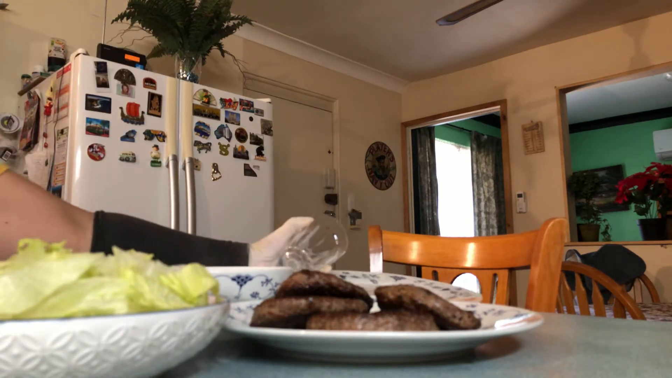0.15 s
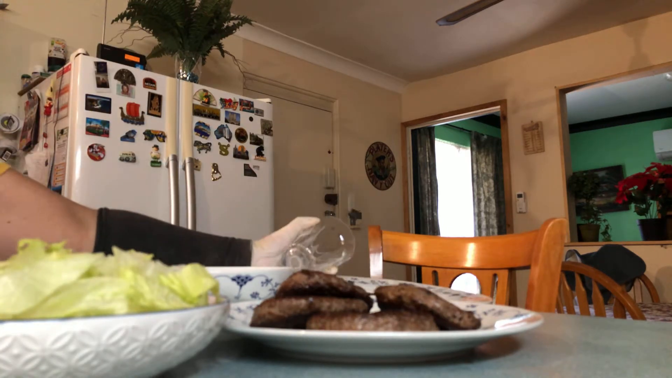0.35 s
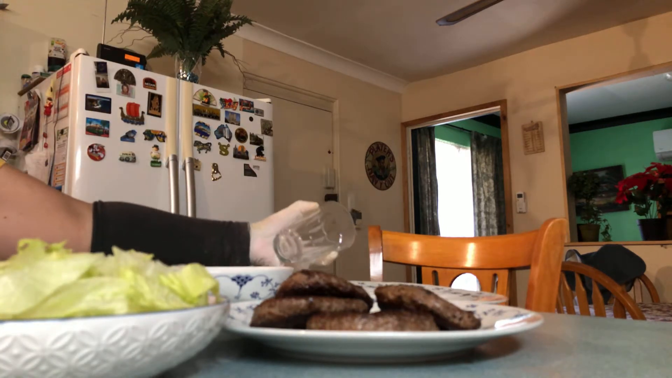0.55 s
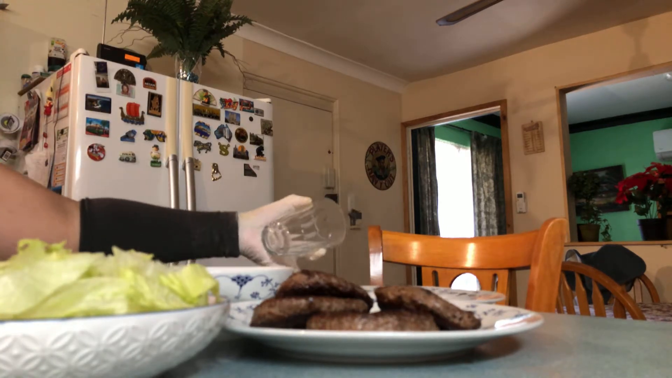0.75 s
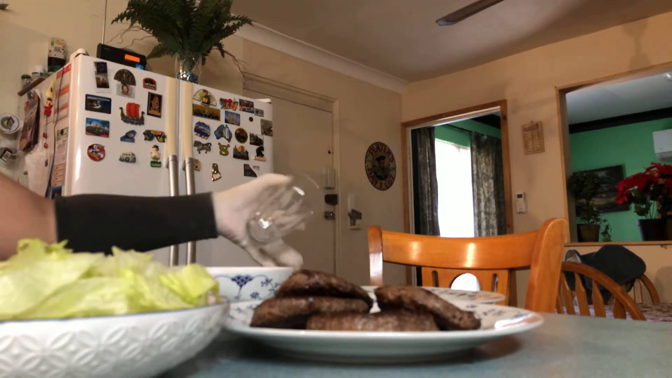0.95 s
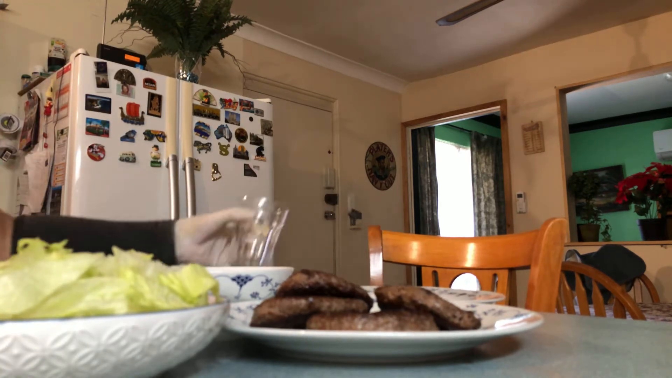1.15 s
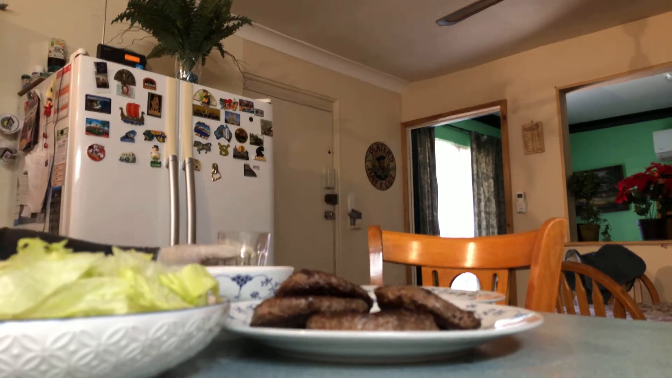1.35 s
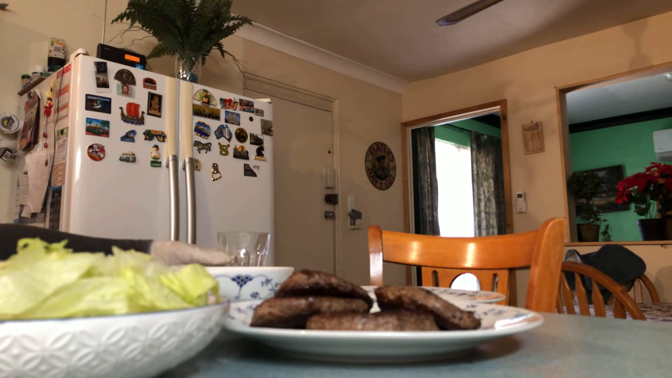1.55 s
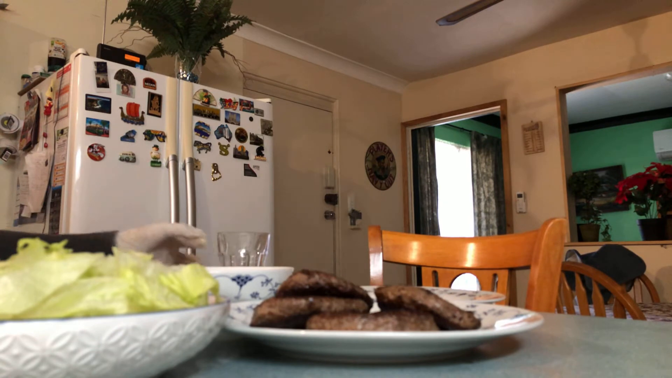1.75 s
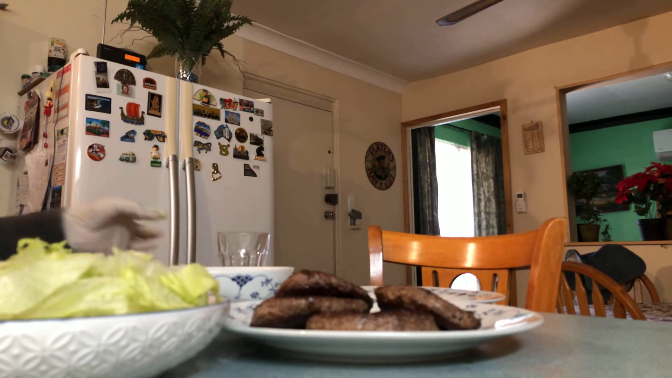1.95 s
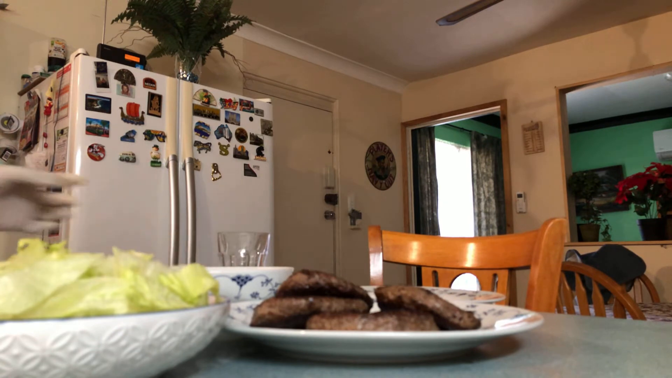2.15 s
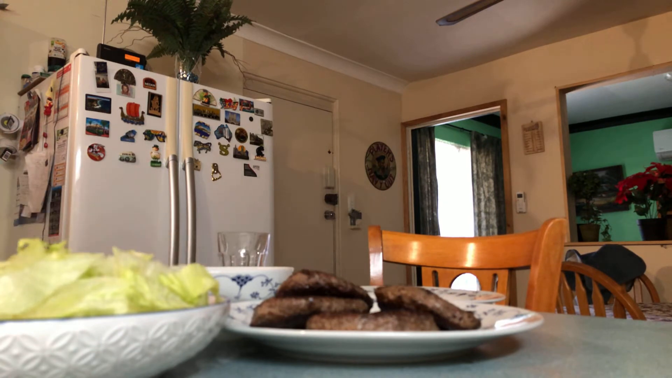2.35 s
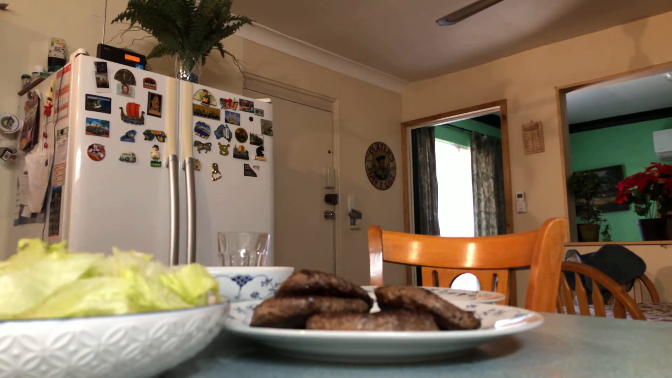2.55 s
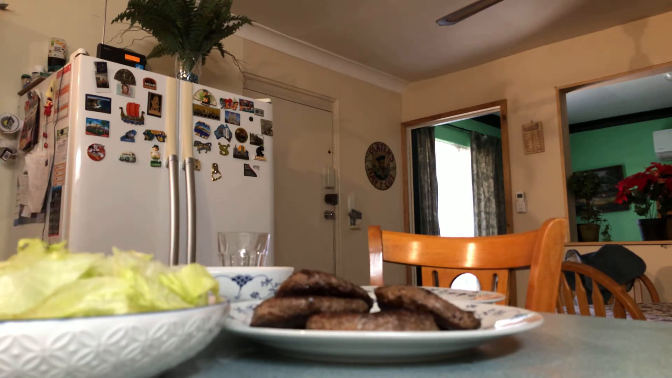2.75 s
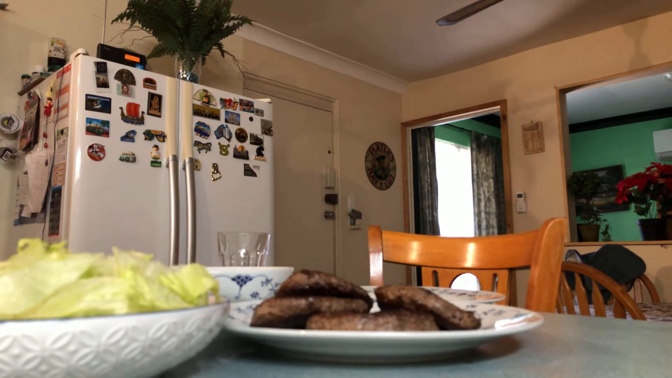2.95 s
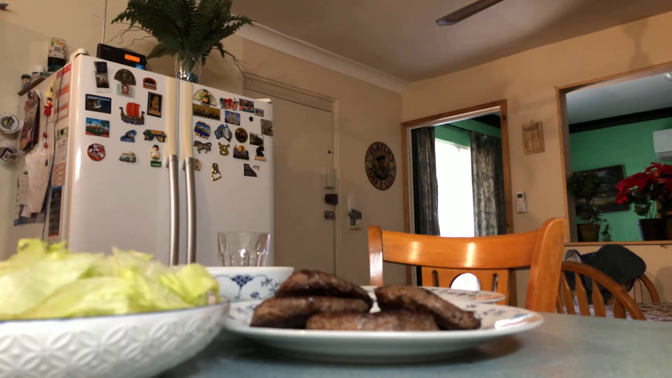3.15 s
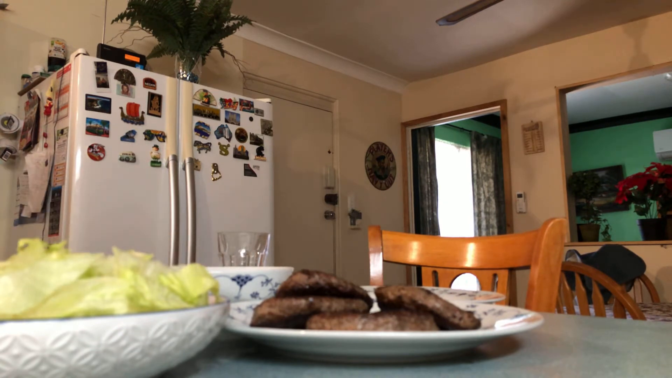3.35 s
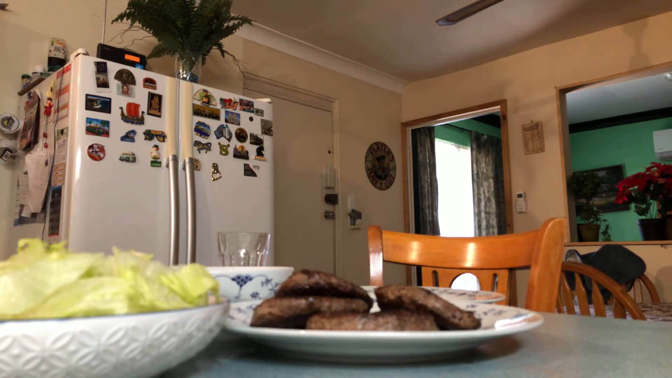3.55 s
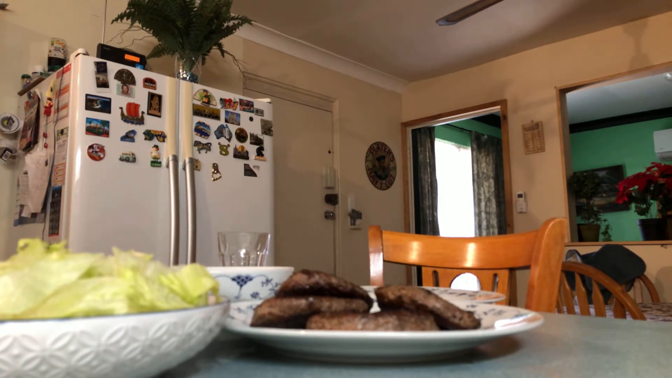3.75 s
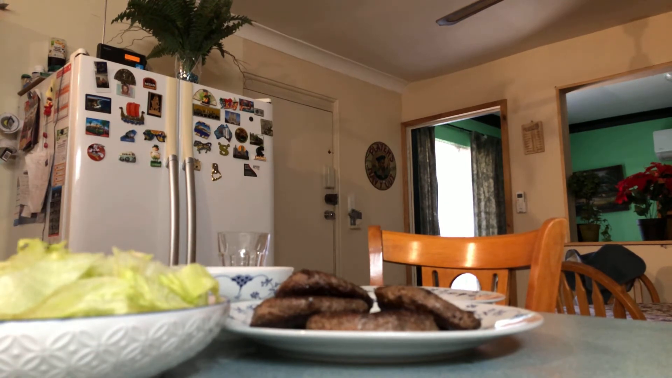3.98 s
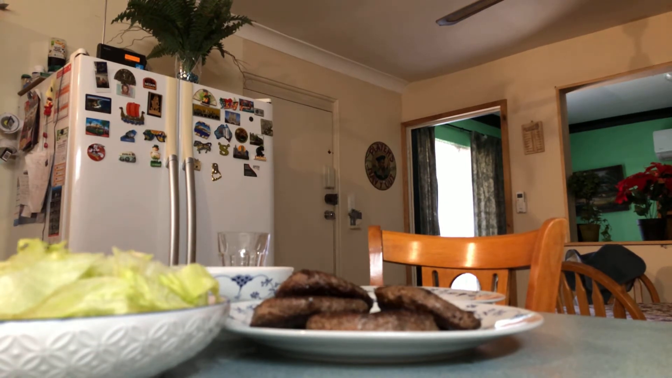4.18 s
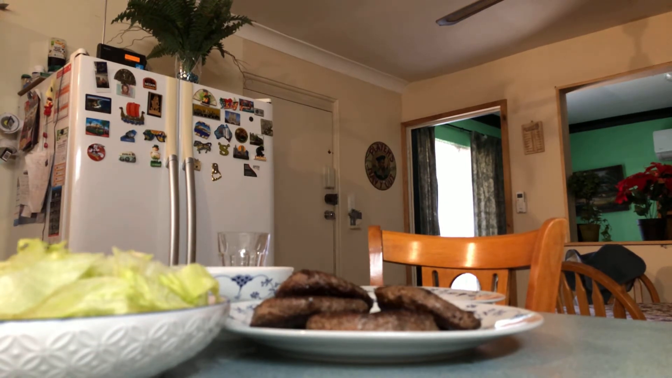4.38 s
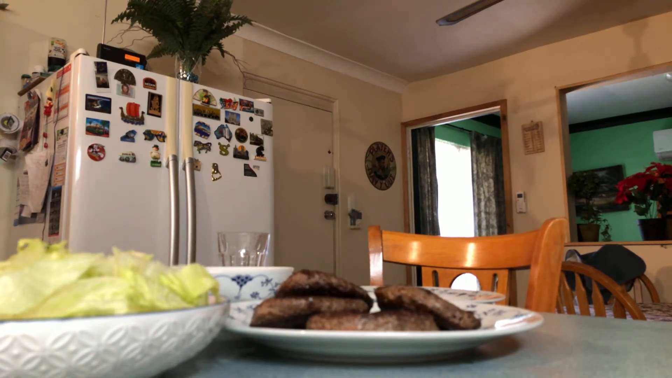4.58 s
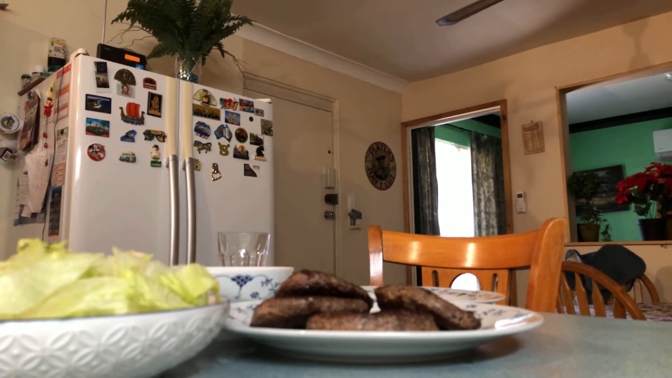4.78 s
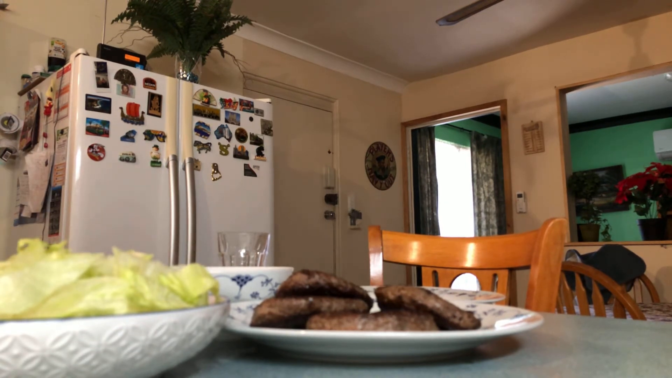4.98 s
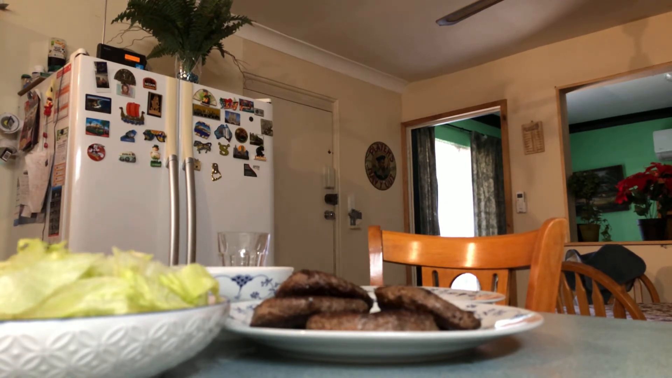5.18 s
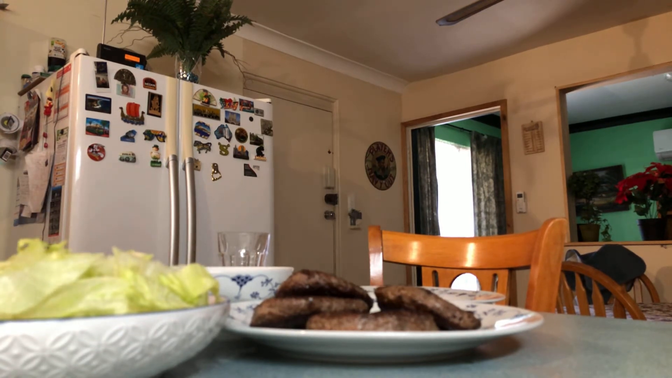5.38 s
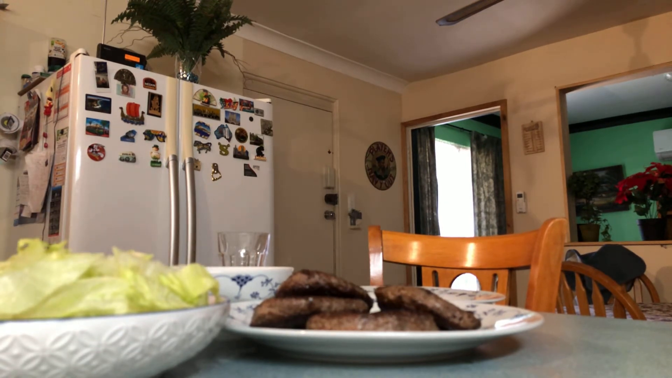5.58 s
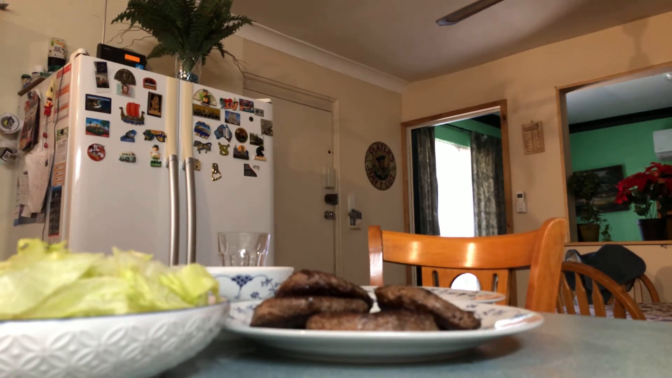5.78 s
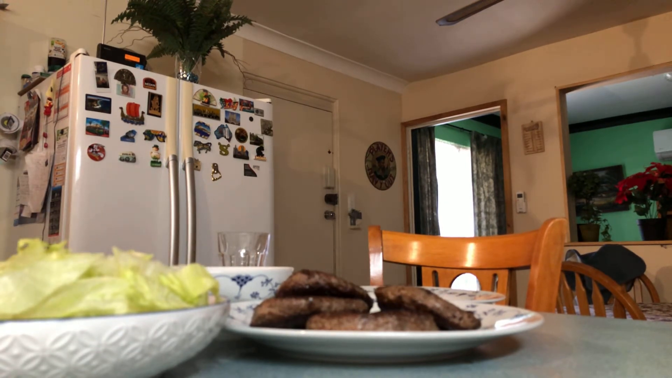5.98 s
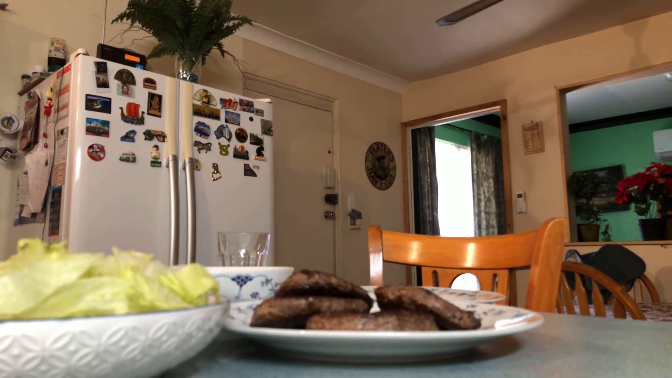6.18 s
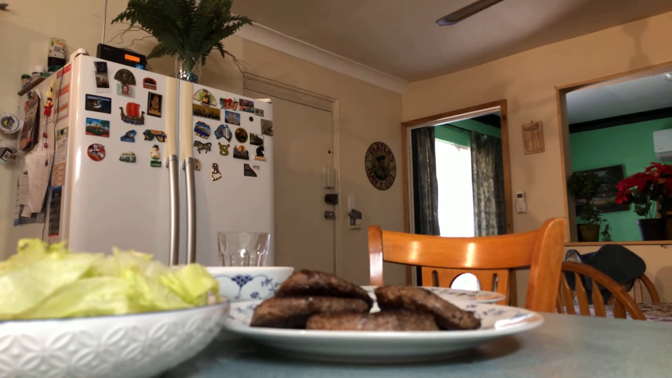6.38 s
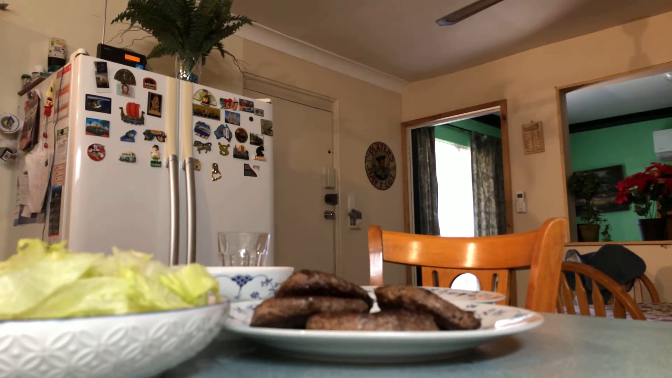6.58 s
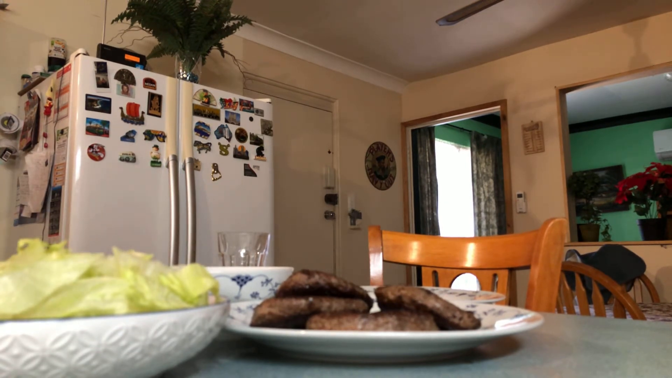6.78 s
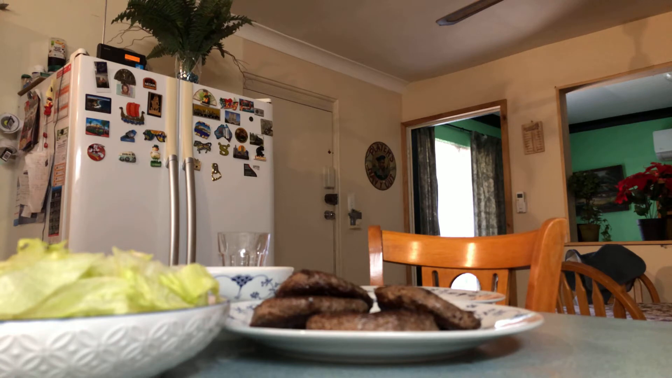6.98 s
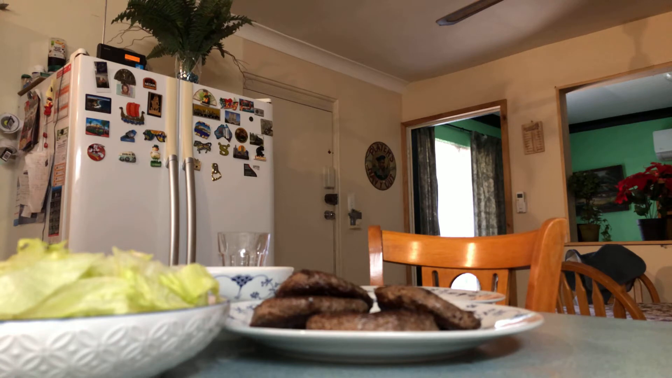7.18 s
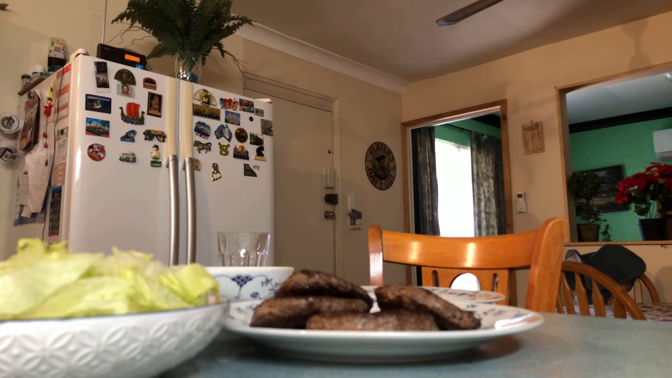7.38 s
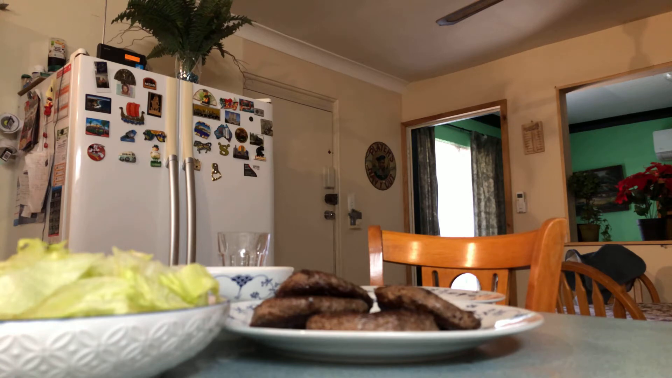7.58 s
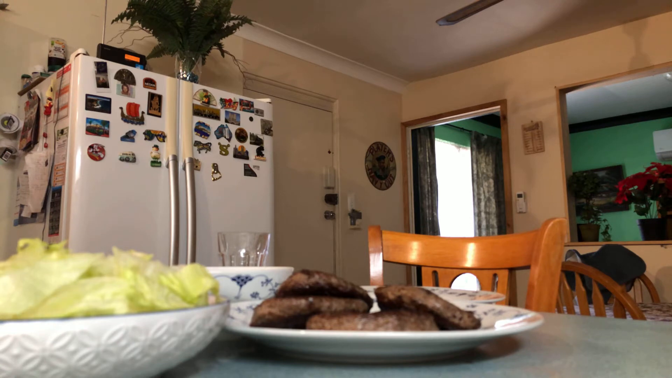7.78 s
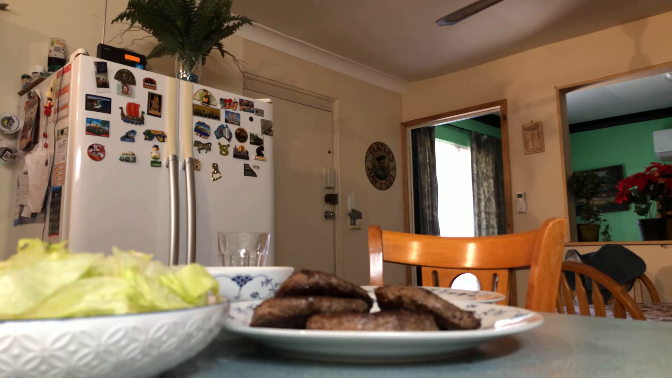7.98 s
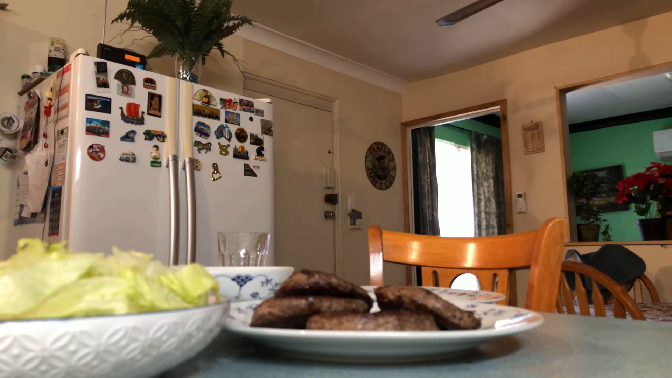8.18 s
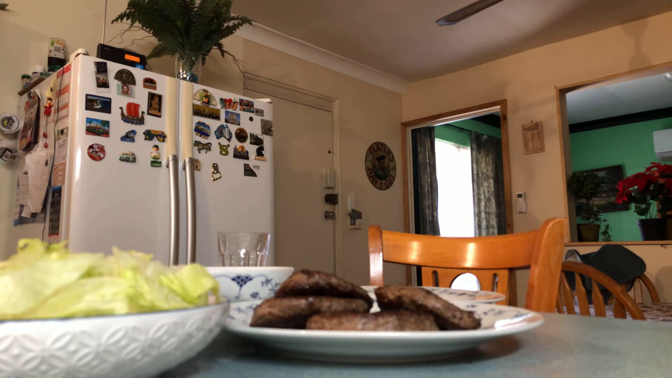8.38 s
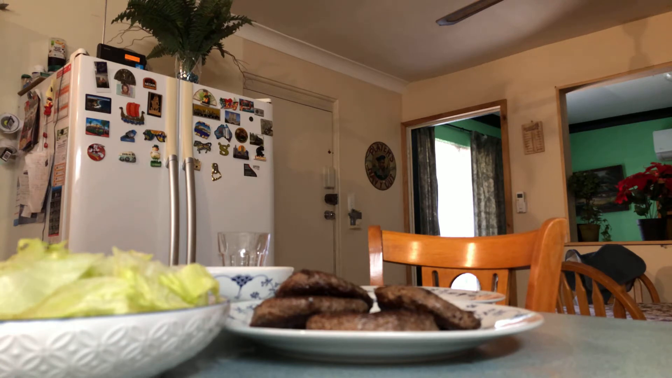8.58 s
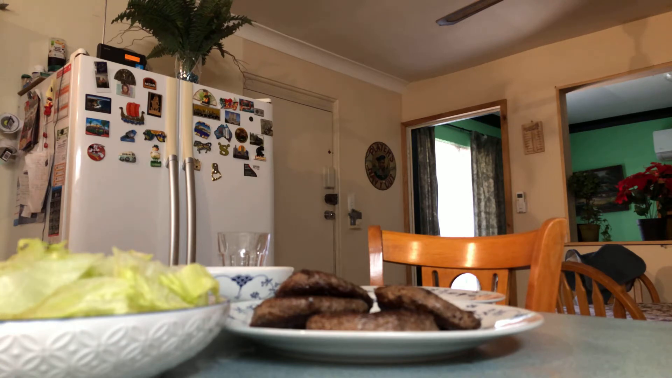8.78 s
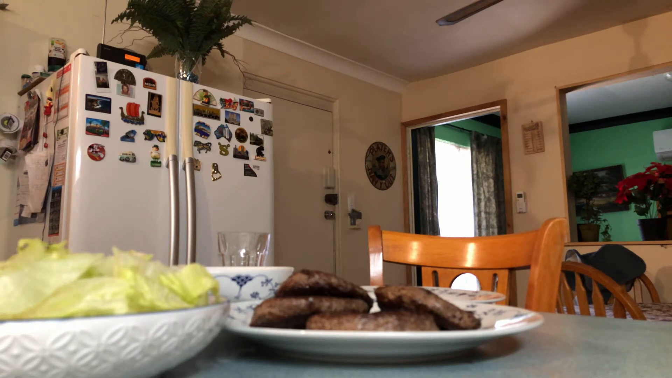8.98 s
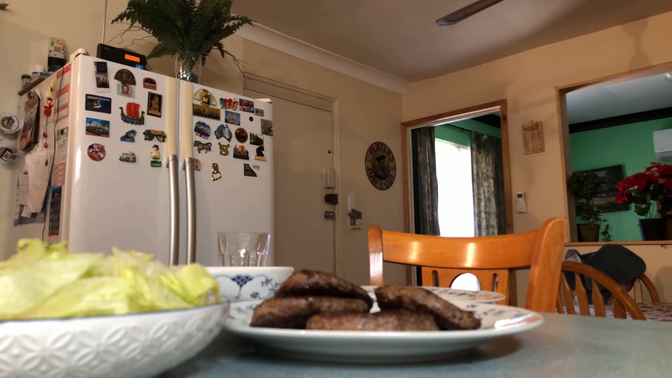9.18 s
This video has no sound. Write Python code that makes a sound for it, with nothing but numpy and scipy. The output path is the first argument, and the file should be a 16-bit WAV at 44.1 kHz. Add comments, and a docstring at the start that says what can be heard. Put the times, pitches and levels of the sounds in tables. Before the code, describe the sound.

A faint low hum runs throughout in a hard-walled kitchen with a short echo. At the start a glass tumbler knocks twice on the table that holds the microphone and brushes a bowl, which rings softly. Around 0.5 seconds it rolls on its rim and squeaks under a glove, with a clack and another knock. At 1.3 seconds it lands with a thump of the table top.

From about 2.4 seconds, across the room, a hollow wooden drawer slides and bumps, loudest near 3.7 seconds, where cutlery rattles and a spoon rings. After a pause, the spoon rings again at 5.2 seconds. A second drawer scrapes and knocks hard at 6.2 seconds. Busy sliding, bumping and rattling follow, with sharp utensil clacks between 7 and 8.5 seconds. A fork rings at 7.3, 8 and 9 seconds, and the spoon rings brightly just after.

```python
"""A dinner table is laid in a hard-walled kitchen, over a faint steady hum. First a tumbler knocks on the
table that the microphone stands on and brushes a bowl. It rolls on its rim, squeaks under a glove and is
set down with a thump of the table top. Then, across the room, one hollow wooden drawer slides and bumps,
and later a second. As cutlery is picked out, loose pieces rattle, utensils clack, and a spoon and then
a fork ring."""
import sys
import numpy as np
from scipy import signal
from scipy.fft import rfft, irfft, next_fast_len
from scipy.io import wavfile

SR = 44100
rng = np.random.default_rng(int(sys.argv[2]) if len(sys.argv) > 2 else 0)


def dump(signal):
    """Clip the signal to [-1, 1] and save it as 16-bit WAV at the path in sys.argv[1]."""
    limited = np.clip(np.atleast_2d(signal).T, -1, 1)
    pcm = np.round(limited * 32767).astype(np.int16)
    wavfile.write(sys.argv[1], SR, pcm)


N = 407484


def amp(db):
    """Decibels to gain."""
    return 10 ** (np.asarray(db) / 20)


def unit_rms(x):
    """Scale to rms 1."""
    return x / np.sqrt(np.mean(x ** 2) + 1e-20)


def curve_at(points, hz):
    """Read (freq_hz, value) points on a log frequency axis."""
    freqs, values = np.transpose(points)
    return np.interp(np.log(hz + 1), np.log(freqs + 1), values)


def add(track, start_s, x):
    """Mix x into the track from start_s on."""
    start = max(round(start_s * SR), 0)
    track[start:start + len(x)] += x[:len(track[start:])]


def filtered(x, response):
    """Pass x through a complex frequency response."""
    size = next_fast_len(len(x) + SR // 4, True)
    return irfft(rfft(x, size) * response(np.fft.rfftfreq(size, 1 / SR)), size)[:len(x)]


def equalised(x, gain_db, size=4096):
    """Minimum-phase EQ that follows gain_db(hz)."""
    cepstrum = irfft(np.log(amp(gain_db(np.fft.rfftfreq(size, 1 / SR))) + 1e-9))
    cepstrum[1:size // 2] *= 2
    cepstrum[size // 2 + 1:] = 0
    return signal.fftconvolve(x, irfft(np.exp(rfft(cepstrum))))[:len(x)]


def resonances(modes, f):
    """Summed response of (pitch_hz, width_hz, gain_db) resonances."""
    return sum(amp(db) * 1j * f * width / (hz * hz - f * f + 1j * f * width) for hz, width, db in modes)


# the kitchen's reverb: freq_hz, t60_s
ROOM_DECAY = [(100, 0.6), (300, 0.47), (900, 0.58), (2000, 0.47), (5000, 0.47), (9000, 0.41), (15000, 0.38)]
def in_room(x, wet_db, early_db, early_t60_s):
    """Direct sound, quick echoes from near surfaces and the kitchen's tail, drawn anew for each sound."""
    hz, frame_s, spectrum = signal.stft(rng.standard_normal(SR * 2 // 3), SR, nperseg=256)
    decay = amp(-60 * frame_s / curve_at(ROOM_DECAY, hz)[:, None])
    tail = signal.istft(spectrum * decay, SR, nperseg=256)[1]
    t = np.arange(len(tail)) / SR
    tail *= 1 - np.exp(-t / 0.0032)
    early = rng.standard_normal(len(t)) * amp(-60 * t / early_t60_s)
    path = amp(wet_db) * tail / np.linalg.norm(tail) + amp(early_db) * early / np.linalg.norm(early)
    path[0] += 1  # direct sound
    return signal.fftconvolve(x, path / np.linalg.norm(path))[:len(x)]


def strokes(rows, eq, grains_per_s, spread_db):
    """Friction and jostling: tiny contacts under strokes that swell and fade."""
    out, t = np.zeros(N), np.arange(SR) / SR
    for middle_s, half_s, db, tilt in rows:
        grains = rng.standard_normal(SR) * (rng.random(SR) < grains_per_s / SR)
        grains *= amp(spread_db * rng.standard_normal(SR))
        texture = unit_rms(equalised(grains, lambda f: curve_at(eq, f) + tilt * np.log2(1 + f / 200)))
        from_middle = t / half_s - 2
        swell = np.exp(-from_middle ** 4 / (1 + from_middle ** 2))
        stroke = in_room(texture * swell, wet_db=2.5, early_db=2, early_t60_s=0.098)
        add(out, middle_s - 2 * half_s, amp(db) * stroke)
    return out


def ringing(hits, modes, waver_hz, attack_s):
    """Every touch rings an object's modes at new strengths; they waver as it moves in the hand."""
    out, t = np.zeros(N), np.arange(SR * 2 // 3) / SR
    hz, level_db, t60_s = np.transpose(modes)[:, :, None]
    envelopes = amp(level_db - 60 * t / t60_s) * (1 - np.exp(-t / attack_s))
    for start_s, db in hits:
        drift = np.cumsum(rng.standard_normal(envelopes.shape), 1) * np.sqrt(2 * np.pi * waver_hz / SR)
        strengths = amp(db + rng.uniform(-2, 2, len(modes)))
        ring = strengths @ (envelopes * np.sin(2 * np.pi * hz * t + drift))
        add(out, start_s, in_room(ring, wet_db=-3, early_db=-7.5, early_t60_s=0.078))
    return out


# room tone: freq_hz, gain_db
HUM_EQ = [(13, -56.5), (22, -26.5), (38, -7), (70, -14.5), (92, 0), (128, -7.5), (169, -0.5), (317, -2.5),
          (396, -3.5), (454, -11.5), (493, -8.5), (745, -16), (855, -14), (1190, -20), (15800, -39.5)]
def room_hum():
    """Low steady noise of the kitchen, with faint hiss."""
    return amp(-60) * unit_rms(filtered(rng.standard_normal(N), lambda f: amp(curve_at(HUM_EQ, f))))


# rim rolls and glove squeaks: middle_s, half_length_s, level_db, tilt_db_per_octave
RIM_ROLLS = [(.35, .06, -48, -1), (.48, .04, -42, -6)]
GLOVE_SQUEAKS = [(.472, .008, -42.5, -1), (.515, .02, -51, -5), (.58, 0.009, -47, -5),
                 (.64, .05, -56.5, 7.5), (1.03, 0.014, -69, -4.5), (1.45, 0.02, -65, 11)]
# the low roll and the thin squeak: freq_hz, gain_db
ROLL_EQ = [(100, -35), (190, -12.5), (245, 3), (330, -13.5), (600, -14), (1300, -15.5), (3000, -30),
           (15000, -49)]
SQUEAK_EQ = [(2500, -35.5), (3800, -12.5), (4300, -3), (4900, -3), (5600, -18.5), (12000, -30.5)]
def tumbler_turning():
    """The rim rolls on the table and a glove squeaks on the glass."""
    roll = strokes(RIM_ROLLS, ROLL_EQ, grains_per_s=820, spread_db=7)
    return roll + strokes(GLOVE_SQUEAKS, SQUEAK_EQ, grains_per_s=700, spread_db=6)


# touches on glass and bowl: start_s, level_db
GLASS_TOUCHES = [(.043, -60), (.117, -59.5), (.367, -53.5), (.565, -52), (.701, -48)]
BOWL_TOUCHES = [(.043, -46.5), (.117, -48), (.296, -53.5)]
# their partials: pitch_hz, level_db, t60_s
GLASS_MODES = [(2543, -0.5, 0.56), (3420, -5.5, 0.53), (3810, -8.5, 0.56), (4540, -10.5, 0.82),
               (5190, -3, 0.37), (4845, -12, 0.41), (6100, -16.5, .5), (6500, -13.5, 0.476),
               (7830, -15, 0.45), (8570, -16, 0.44)]
BOWL_MODES = [(810, -6, 0.87), (1310, 0, 0.67), (2576, -12.5, 0.97), (3900, -12, 0.62)]
def glass_and_bowl():
    """The handled tumbler rings faintly, and so does the bowl it brushes."""
    glass = ringing(GLASS_TOUCHES, GLASS_MODES, waver_hz=50, attack_s=0.00214)
    return glass + ringing(BOWL_TOUCHES, BOWL_MODES, waver_hz=11, attack_s=0.002)


# touches on spoon and fork: start_s, level_db
SPOON_TOUCHES = [(3.36, -68), (3.755, -47.5), (5.185, -51), (5.745, -72), (5.965, -69), (6.81, -66),
                 (8.445, -66), (9.14, -43)]
FORK_TOUCHES = [(7.11, -72), (7.18, -70), (7.322, -53), (8.0, -58), (9.037, -51)]
# their bright partials: pitch_hz, level_db, t60_s
SPOON_MODES = [(3540, -3, 0.38), (5230, -5.5, 0.48), (6400, -0.5, 0.25), (7400, -1, 0.29), (9670, -3, 0.25),
               (10840, -10.5, 0.23), (11600, 1, 0.14), (12100, -3.5, 0.22), (14940, -2.5, 0.25),
               (15520, -4, .2)]
FORK_MODES = [(2814, -18, 0.41), (5390, -10, 0.9), (6784, 8, 0.14), (7820, 6, 0.23), (8820, 7.5, 0.22),
              (10400, 0, 0.19), (10970, 4, 0.11), (13390, 5, 0.16)]
def spoon_and_fork():
    """A spoon and a fork ring freely when touched."""
    spoon = ringing(SPOON_TOUCHES, SPOON_MODES, waver_hz=22.22, attack_s=0.0037)
    return spoon + ringing(FORK_TOUCHES, FORK_MODES, waver_hz=11, attack_s=0.004)


# hard clacks, first the tumbler on a dish, then utensil on utensil: start_s, level_db
CLACKS = [(.564, -35.5), (3.166, -53), (6.189, -38.5), (7.099, -32.5), (7.275, -35), (7.309, -36.5),
          (8.09, -31.5), (8.446, -33)]
# their short partials: pitch_hz, level_db, t60_s
CLACK_MODES = [(1400, -1.5, 0.066), (1550, -3.5, 0.16), (1803, -13.5, 0.036), (2015, -2.5, .07),
               (2274, 1.5, 0.052), (2410, 0, 0.032), (3354, -6, 0.061), (3944, -6, .04)]
def hard_clacks():
    """Hard things strike each other, the tumbler a dish and later utensils one another, and die away quickly."""
    return ringing(CLACKS, CLACK_MODES, waver_hz=25, attack_s=0.00062)


# rumbles and judders: middle_s, half_length_s, level_db, tilt_db_per_octave
RUNNER_RUMBLES = [(3.19, .03, -46, -2), (3.37, 0.05, -41, -4), (3.79, .06, -40, 1), (6.24, 0.027, -56, 6.5),
                  (8.47, .02, -46, 3)]
WOOD_JUDDERS = [(3.49, .03, -48, -2), (3.72, .022, -34.5, -2.5), (6.41, .025, -31.5, -1.5),
                (6.47, .025, -41.5, -3)]
# the deep rumble and the midrange judder: freq_hz, gain_db
RUMBLE_EQ = [(25, -50.5), (50, -1), (80, 6), (140, 3.5), (220, 2.5), (500, -32.5)]
JUDDER_EQ = [(200, -16), (400, -16), (500, 2.5), (660, 4), (850, -3), (1300, -7.5), (3000, -33.5)]
def drawer_runners():
    """A drawer rumbles on its runners and the wood judders as it is pushed."""
    rumble = strokes(RUNNER_RUMBLES, RUMBLE_EQ, grains_per_s=1000, spread_db=0.5)
    return rumble + strokes(WOOD_JUDDERS, JUDDER_EQ, grains_per_s=1200, spread_db=7)


USUAL_DB = -40  # drive of an ordinary slide or knock
# pulls and pushes of a drawer: middle_s, half_length_s, drive_db
DRAWER_SLIDES = [(2.87, .06, -53.5), (3.105, 0.055, -48.5), (3.515, .11, -40.5), (3.74, .04, -32.5),
                 (5.647, 0.029, -51.5), (5.981, 0.058, -43), (6.2, .08, -34), (6.42, 0.065, -33),
                 (6.869, 0.18, -43), (7.16, 0.065, -34), (7.698, 0.054, -45), (8.043, .08, -42),
                 (8.229, .06, -49), (8.529, 0.13, -44.5), (8.902, .08, -39), (9.148, .055, -35.5)]
# the wooden scrape: freq_hz, gain_db
SLIDE_EQ = [(18, -51), (30, -30), (158, -9), (211, -14), (312, -6.5), (497, -11), (597, -19), (662, -13.5),
            (1270, -15.5), (1480, -18), (6700, -32), (15000, -49)]
def drawer_slides():
    """Wood slides on wood, brighter when it is louder."""
    rows = [(middle_s, half_s, db, -1.5 + 0.1 * (db - USUAL_DB)) for middle_s, half_s, db in DRAWER_SLIDES]
    return strokes(rows, SLIDE_EQ, grains_per_s=700, spread_db=6.5)


def content_taps(offset_db=-6.5, spread_db=2.5, hardness_db=-1.5):
    """Cues for light knocks: once in every slide something shifts and taps the drawer's wall."""
    chance = rng.uniform(-1, 1, (len(DRAWER_SLIDES), 2))
    return [(middle_s + half_s * when, db + offset_db - spread_db * lightness, hardness_db)
            for (middle_s, half_s, db), (when, lightness) in zip(DRAWER_SLIDES, chance)]


# bumps of dishes, drawers and utensils: start_s, drive_db, hardness_db, rattle_db
BUMPS = [(0.47, -41.5, 1.5, -54.5), (.564, -30.5, -1.5, -49), (2.404, -58, -6.5, -48.5),
         (2.761, -48.5, 2, -58.5), (2.946, -57.5, 18, -75), (3.166, -36.5, 3.5, -63.5),
         (3.326, -35, -13, -53), (3.556, -39, -16.5, -64), (3.691, -25.5, -4, -44),
         (3.752, -26.5, -2, -35.5), (3.85, -37, 5.5, -43), (5.151, -52.5, 11.5, -56), (5.183, -45, 4, -54),
         (5.534, -55, -2, -77), (5.743, -46, -7.5, -66), (5.893, -43.5, -7, -65), (6.055, -37.5, -10, -58),
         (6.163, -28, -3, -58), (6.187, -18.5, 0.5, -43), (6.403, -37, -4.5, -55), (6.465, -32.5, -2, -60),
         (6.785, -46, -4, -59), (6.882, -48.5, -10, -74), (6.969, -49, 1, -70.5), (7.097, -42, 3, -50.5),
         (7.115, -39, -8, -45.5), (7.164, -33, -3.5, -47), (7.273, -32, -0.5, -59),
         (7.307, -30, -0.5, -47.5), (7.577, -49, -2, -61), (7.639, -43, 5, -63), (7.797, -46.5, 0.5, -73),
         (7.911, -41, -7, -57.5), (7.974, -37, -2.5, -56), (7.997, -32.5, 4.5, -47),
         (8.089, -27, 2.5, -62.5), (8.208, -34, -7, -58.5), (8.419, -32.5, -0.5, -41),
         (8.443, -23, -6, -44), (8.66, -31, -1.5, -68), (8.836, -32, 2, -39), (9.026, -35, 2.5, -39),
         (9.116, -35, 3.5, -31)]
# the tone of a knock: freq_hz, gain_db
KNOCK_EQ = [(25, 13), (60, 32), (130, 49.5), (195, 39.5), (300, 54.5), (500, 46), (800, 42.5), (1300, 45),
            (2100, 42), (2900, 39), (4500, 40.5), (7500, 34.5), (9000, 27), (15500, 16)]
def knocks(thud_db=-4, tick_db=-8):
    """Each bump or tap is a first contact and a quick clatter of smaller ones."""
    out, t = np.zeros(N), np.arange(SR * 2 // 3) / SR
    for start_s, db, hardness_db in [row[:3] for row in BUMPS] + content_taps():
        # soft or weak bumps linger, hard or strong ones are curt
        clatter_t60_s = 0.036 * np.exp(-0.0448 * hardness_db - 0.0364 * (db - USUAL_DB))
        clatter = rng.standard_normal(len(t)) * (rng.random(len(t)) < 0.15) * amp(-60 * t / clatter_t60_s)
        blow = 0.15 * (t == 0) + 0.81 * clatter / (np.linalg.norm(clatter) + 1e-9)
        # hardness trades bass for treble
        balance = [(280, db + thud_db - hardness_db), (1100, db), (5000, db + tick_db + hardness_db)]
        knock = equalised(blow, lambda f: curve_at(KNOCK_EQ, f) + curve_at(balance, f))
        add(out, start_s, in_room(knock, wet_db=6.5, early_db=1.5, early_t60_s=0.095))
    return out


# the jangle of loose pieces: freq_hz, gain_db
RATTLE_EQ = [(530, -47), (900, 0), (1950, 5.5), (3070, -5), (4080, -2), (7680, -9), (8750, -13.5),
             (11600, -15.5), (15500, -20.5)]
def cutlery_rattle(lag_s=0.033, half_s=0.023):
    """Loose pieces jostle just after each bump, more brightly after a hard one."""
    rows = [(start_s + lag_s, half_s, rattle_db, 3 + 0.4 * hardness_db)
            for start_s, _, hardness_db, rattle_db in BUMPS]
    return amp(-1) * strokes(rows, RATTLE_EQ, grains_per_s=830, spread_db=4.5)


# two hollow wooden bodies: pitch_hz, width_hz, gain_db
FIRST_DRAWER_MODES = [(160, 40, 1), (252, 34, 4.5), (321, 17, -1), (454, 83, 2), (740, 260, -13)]
SECOND_DRAWER_MODES = [(145, 10.4, -2.5), (263, 22, -0.5), (316.7, 9.9, 7.5), (371, 69, -15),
                       (504, 27, 1.5), (793, 73, -5.5)]
def drawers(first_from_s=2.0, second_from_s=4.7):
    """Knocks and slides sound directly and through the hollow wood of the drawer in use."""
    t = np.arange(N) / SR
    drive = knocks() + drawer_slides()
    in_second = t > second_from_s
    in_first = (t > first_from_s) & ~in_second
    first = filtered(drive * in_first, lambda f: resonances(FIRST_DRAWER_MODES, f))
    second = filtered(drive * in_second, lambda f: resonances(SECOND_DRAWER_MODES, f))
    return amp(-7) * (drive + first + second)


# glass meets table: start_s, thump_db, hardness_hz, tick_db, boom_db, rebound_ratio
# (each level is relative within its own layer)
LANDINGS = [(.040, -16, 680, -61, -35, 0.71), (.117, -17.5, 800, -60, -36.5, 0.82),
            (.698, -8, 954, -45.5, -25, 0.76), (1.288, -3, 1242, -45, -41, 0.04)]
# the table top, and the whole table on its legs: pitch_hz, width_hz, gain_db
TOP_MODES = [(257.7, 31, 7.5), (311.6, 61, 0), (370, 83, -1), (497, 46, -4), (628, 140, -8.5),
             (800, 140, -2.5), (1100, 370, -4.5), (1239, 78, -14.5), (1900, 500, -25.5)]
LEG_MODES = [(72.15, 14, -20), (135.8, 7.3, 4.5)]
def tumbler_on_table():
    """The heavy glass base thumps the table; a harder contact reaches the top's higher modes."""
    out, t = np.zeros(N), np.arange(SR) / SR
    impulse = 1.0 * (t == 0)
    bounces = np.arange(1, 5)
    tick_eq = [(90, 2), (400, 16.5), (1800, 17.5), (2800, -1.5), (4500, -4), (8000, -17.5),
               (10000, -24), (15000, -20)]  # freq_hz, gain_db
    # bending waves in the top carry the treble to the microphone first
    travel = lambda f: np.exp(-2j * np.pi * np.cumsum(0.00639 / (1 + (f / 1500) ** 2)) * f[1])
    sway = lambda f: resonances(LEG_MODES, f) / (1 + 1j * f / 300) ** 2
    for start_s, thump_db, hardness_hz, tick_db, boom_db, rebound in LANDINGS:
        # landing on its edge, the glass chatters a few times before it settles
        bounce_s = (bounces + rng.uniform(-0.3, 0.3, len(bounces))) * 0.01
        contacts = impulse.copy()
        contacts[(bounce_s * SR).astype(int)] = rebound ** bounces
        contacts *= amp(thump_db + 32) / np.linalg.norm(contacts)
        contact_band = lambda f: 1 / np.sqrt((1 + (f / hardness_hz) ** 8) * (1 + (205 / (f + 1)) ** 6))
        thump = filtered(contacts, lambda f: resonances(TOP_MODES, f) * contact_band(f) * travel(f))
        boom = filtered(amp(boom_db + 56) * impulse, sway)
        burst = amp(tick_db + 22 - 60 * t / 0.015) * rng.standard_normal(SR)
        tick = equalised(burst, lambda f: curve_at(tick_eq, f))
        add(out, start_s, in_room(thump + boom + tick, wet_db=-2.5, early_db=-8, early_t60_s=0.1))
    return out


def scene():
    """Everything reaches one microphone on the table."""
    tumbler = tumbler_on_table() + tumbler_turning() + glass_and_bowl()
    wood = drawers() + drawer_runners()
    cutlery = cutlery_rattle() + hard_clacks() + spoon_and_fork()
    return (tumbler + wood + cutlery + room_hum())[None]


def record(dry):
    """The small microphone loses the deepest bass; the recorder keeps nothing above its band limit."""
    low_cut_hz, band_limit_hz = 42, 15830
    thinned = signal.sosfilt(signal.butter(3, low_cut_hz, "highpass", fs=SR, output="sos"), dry[0])
    return filtered(thinned, lambda f: f < band_limit_hz)[None]


dry = scene()
out = record(dry)
dump(out)
```